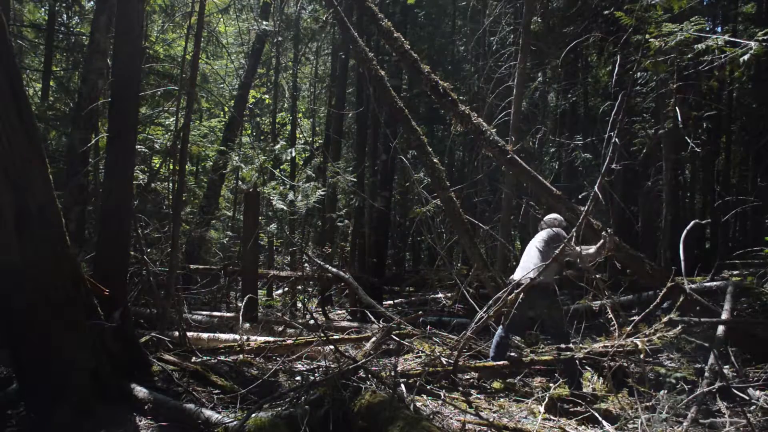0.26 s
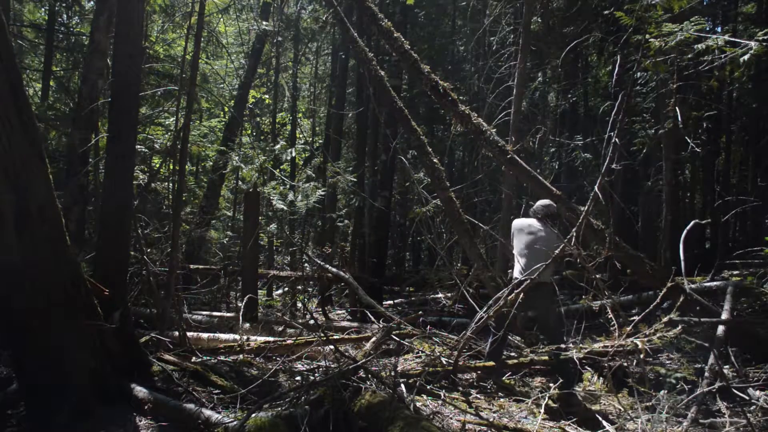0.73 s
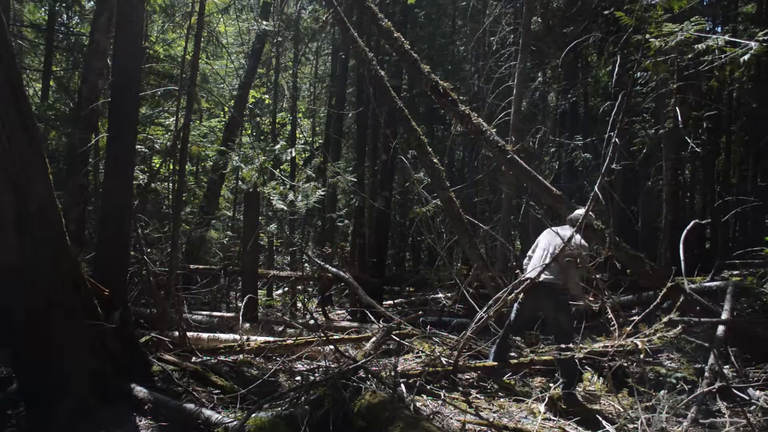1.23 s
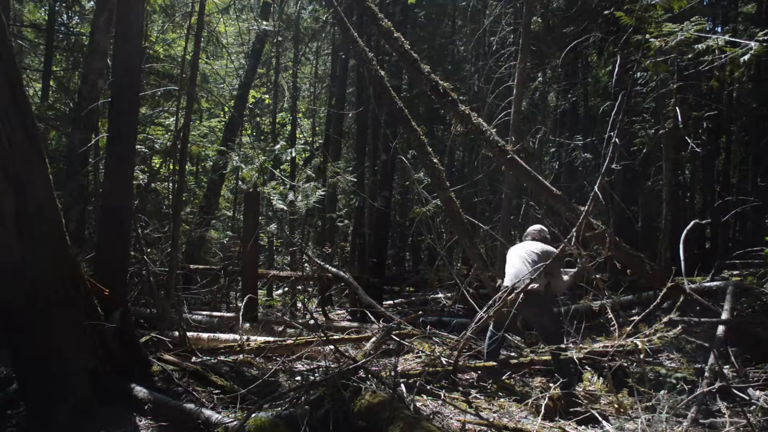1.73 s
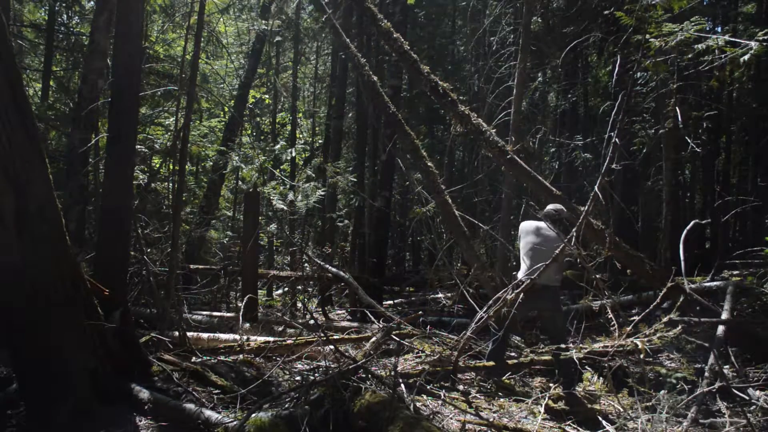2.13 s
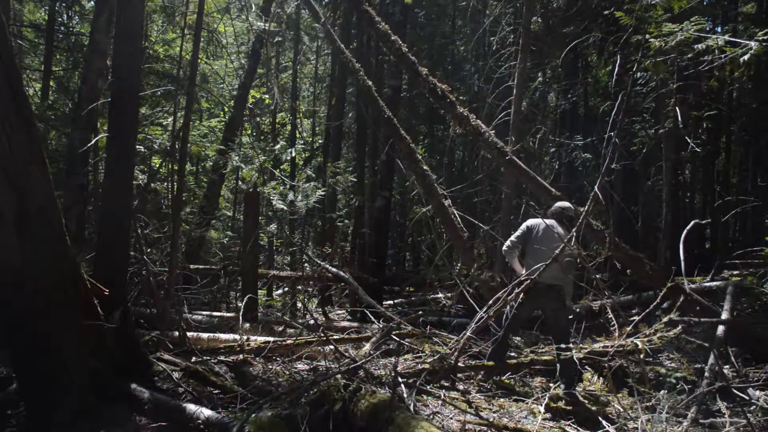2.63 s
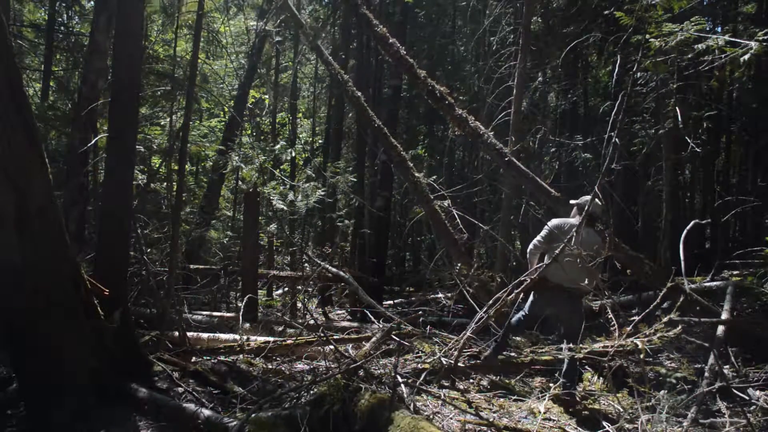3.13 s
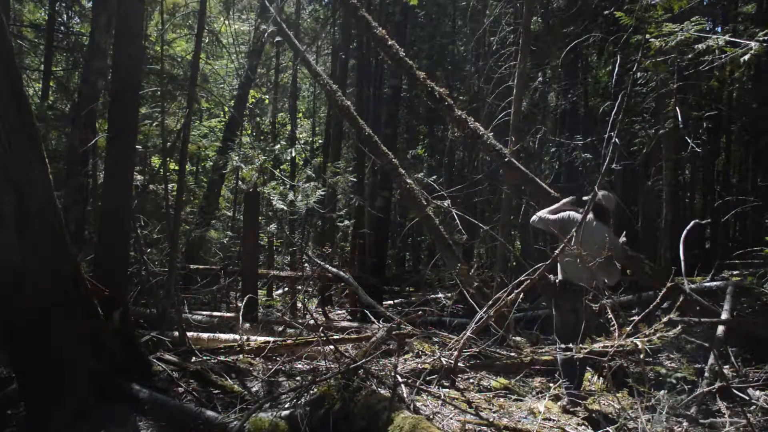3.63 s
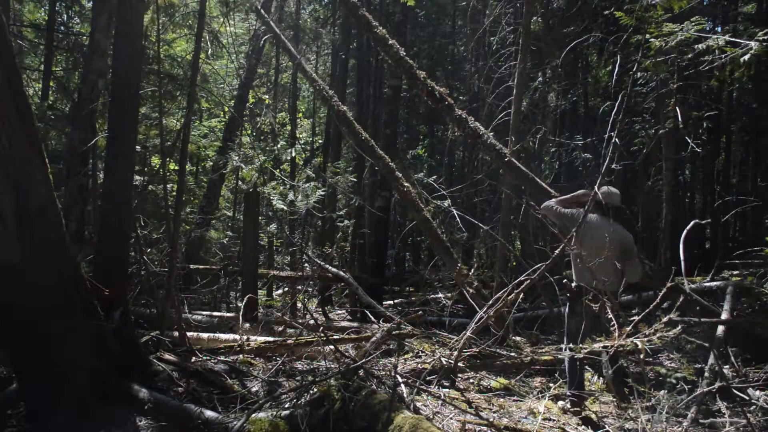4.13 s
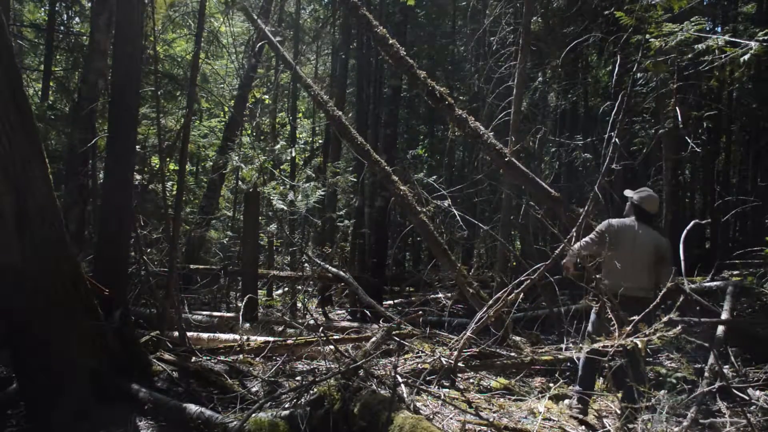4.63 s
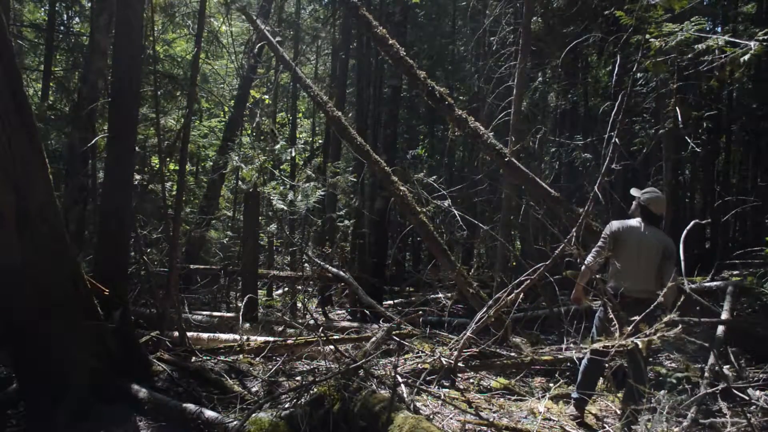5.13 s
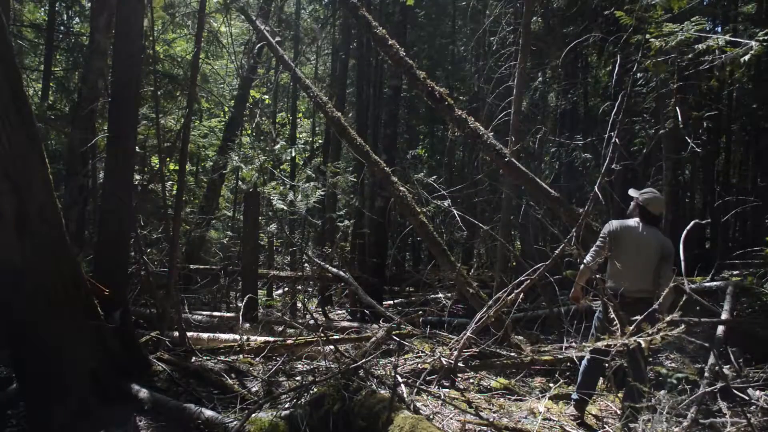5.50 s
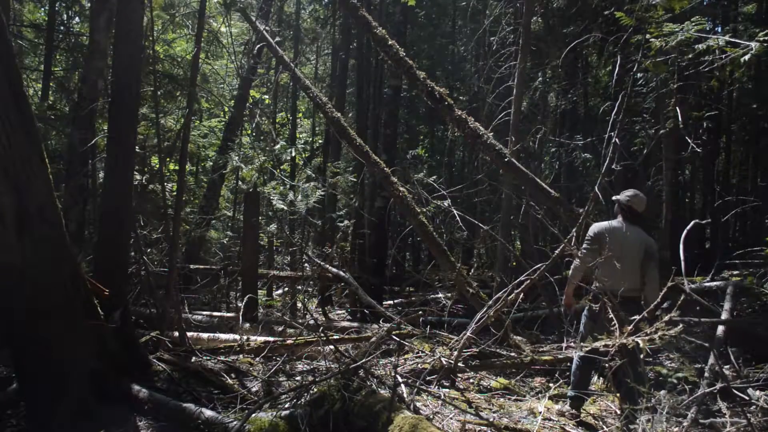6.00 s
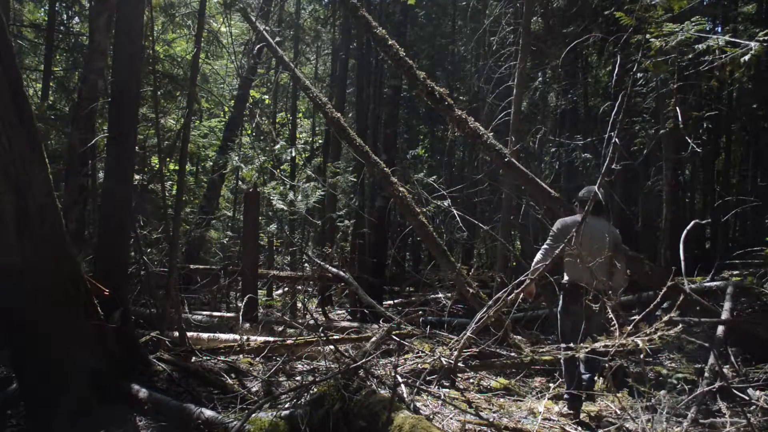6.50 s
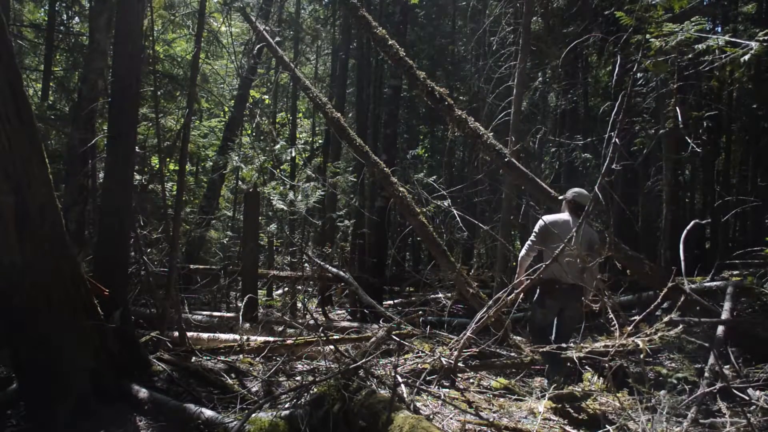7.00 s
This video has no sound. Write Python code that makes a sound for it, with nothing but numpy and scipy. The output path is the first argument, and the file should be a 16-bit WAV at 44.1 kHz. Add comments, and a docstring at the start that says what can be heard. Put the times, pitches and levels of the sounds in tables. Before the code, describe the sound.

Sharp wood breaks ring off surrounding tree trunks, followed by a busy push through brittle brush, small snaps, dull steps and quiet air.

```python
"""In a conifer forest, a man breaks two dead limbs off a leaning tree, pushes through dry twigs and steps away.
Each limb gives a warning tick, then a crack of tearing fibres and ringing wood; both are clipped at full scale.
Twigs are short jerky noise bursts with resonances, the brush is a rain of ringing clicks,
rubbing sticks are noise-driven modes, and footfalls are low bursts.
The trunks scatter all the wood sounds into a long tail of decaying noise bands, over still, coloured air."""
import sys
import numpy as np
from scipy import signal
from scipy.fft import rfft, irfft
from scipy.io import wavfile
from scipy.ndimage import uniform_filter1d

SR = 44100
rng = np.random.default_rng(int(sys.argv[2]) if len(sys.argv) > 2 else 0)


def digitize_waveform(pressure):
    """Quantize a signal to 16-bit integers and store it at the path in sys.argv[1].

    Rows of a 2-D input are taken as channels; values are limited to [-1, 1].
    """
    field = np.atleast_2d(pressure).T
    bounded = np.clip(field, -1, 1)
    quanta = np.round(bounded * 32767).astype(np.int16)
    wavfile.write(sys.argv[1], SR, quanta)


N = 320063

# colour of the still forest air: (frequency [Hz], relative level per Hz [dB])
AIR_COLOUR = [(15, -10), (25, -10.5), (114, 7.5), (640, -5), (773, -7.5), (959, -7), (1100, -6), (1220, -9),
              (1520, -9.5), (2750, -13), (3320, -13), (4360, -12.5), (8110, -26.5), (9530, -15),
              (15900, -26)]
# colours of fine twigs and of thicker sticks: (frequency [Hz], relative level per Hz [dB])
CRACKLE_COLOUR = [(1500, -12.5), (3000, -5), (5000, -3.5), (8000, 0), (10800, 0), (12500, -9.5),
                  (16000, -20.5)]
CLATTER_COLOUR = [(120, -5), (300, 8.5), (600, -6.5), (1150, 0.5), (2000, -4.5), (3200, -10.5),
                  (5500, -28.5)]
# effort of pushing through the thicket, as the level of its crackle: (time [s], level [dB])
PUSH_EFFORT = [(2.3, -56), (2.5, -42.5), (2.66, -36.5), (2.92, -43), (3.05, -36), (3.15, -39),
               (3.33, -33.5), (3.62, -40.5), (3.8, -33), (3.96, -44), (4.22, -38.5), (4.42, -41),
               (4.56, -47), (4.68, -42.5), (4.9, -65.5)]
# single rustles as he shifts his grip or takes a step: (time of the peak [s], level [dB], length [s])
RUSTLES = [(0.113, -52, 0.15), (0.445, -37.5, 0.037), (1.584, -53, .03), (1.73, -53, 0.027),
           (2.643, -33.5, 0.031), (4.652, -44, 0.031), (5.107, -52, 0.12), (5.43, -47.5, 0.019),
           (5.86, -51.5, .08), (6.239, -44, 0.025), (6.527, -54, 0.021), (6.82, -53, 0.075),
           (6.975, -54, 0.047)]
# scatter from the trunks against the direct sound: (frequency [Hz], level [dB])
FOREST_LEVELS = [(60, -6), (280, -4.5), (500, -3), (950, 3.5), (1500, -2.5), (2500, -6), (4000, -5.5),
                 (10000, -10), (12500, -5.5), (16000, -9)]
# how long the trunks keep scattering: (frequency [Hz], 60 dB decay time [s])
FOREST_DECAYS = [(60, 0.76), (250, 0.86), (900, 1.35), (2000, 0.89), (5000, 1.08), (10000, 0.98),
                 (16000, 0.75)]
# sticks rubbing on each other: (time [s], level [dB], pitch [Hz], length [s])
RUBS = [(0.299, -48.5, 2550, 0.016), (1.601, -41.5, 2460, 0.014), (3.011, -29, 1460, 0.016),
        (3.217, -34.5, 1230, 0.027), (3.728, -29, 1360, 0.016), (4.137, -33, 1210, 0.015),
        (4.382, -37, 1200, .02), (4.833, -40.5, 2600, 0.012), (4.863, -43, 1430, 0.011),
        (5.104, -43.5, 1420, 0.028), (5.22, -39.5, 1414, 0.018), (5.262, -57, 1480, 0.014),
        (5.316, -52, 1400, 0.009), (5.619, -55, 1080, .014), (5.671, -53.5, 1154, 0.017),
        (6.135, -54, 1100, .015), (7.061, -54.5, 1500, 0.013)]
# modes of a rubbed stick: (multiple of the pitch [ratio], relative level [dB], 60 dB decay time [s])
STICK_MODES = [(.68, -17, .01), (0.801, 0, 0.022), (1, 6.5, 0.017), (1.35, -12, 0.01)]
# twigs snapping: (time [s], level [dB], brightness [dB per octave], main ring [Hz], tearing time [s])
SNAPS = [(0.4402, -44.5, 7.5, 8800, .004), (0.5441, -31, 3, 8800, 0.019),
         (1.1514, -45.5, -2.5, 1320, 0.0039), (1.2683, -52, 4, 8900, 0.00083),
         (1.465, -49, 0.5, 9360, .0013), (1.9081, -30.5, 3.5, 8700, 0.0016),
         (2.0996, -33.5, 7.5, 8400, 0.024), (2.2522, -36, 4.5, 4170, 0.0022),
         (2.4738, -37.5, -1.5, 3900, 0.0011), (2.6084, -35, 3, 4070, .0015), (2.6201, -30, 0, 8900, 0.0018),
         (2.6405, -30, -1, 6000, 0.0032), (2.6994, -34.5, -3, 2540, 0.0017),
         (2.8175, -28, -2, 1380, 0.0045), (2.823, -22.5, 3, 4100, 0.0011),
         (2.8945, -28.5, 2, 10000, 0.00064), (3.0172, -28.5, 0, 1500, 0.0058),
         (3.0626, -28.5, 0, 10200, 0.0087), (3.181, -26.5, 0.5, 1980, .0034),
         (3.2133, -30.5, -.5, 2010, 0.004), (3.23, -31, 0, 1580, 0.0034), (3.3396, -39, 10, 8400, 0.0023),
         (3.372, -28.5, 2.5, 9400, 0.00041), (3.4307, -18, 3, 9000, 0.0013),
         (3.5334, -24.5, 2, 6450, 0.0016), (3.5494, -34, -2.5, 1590, 0.003),
         (3.6782, -32.5, 1, 9600, 0.0091), (3.7056, -32, 2.5, 4540, .001),
         (3.7412, -28, 3.5, 10000, 0.00088), (3.7722, -21, 6.5, 10850, 0.0033),
         (3.7754, -17.5, 0.5, 4800, 0.00058), (3.841, -32, 2, 8000, 0.0022),
         (3.872, -38.5, 8, 10300, .0007), (3.9211, -24, 4.5, 9600, 0.0006),
         (3.9348, -30.5, 6, 5160, 0.00027), (3.9773, -27.5, 1, 7300, 0.00053),
         (4.1399, -30, -0.5, 5100, 0.0058), (4.208, -36, 3, 8100, .005), (4.2462, -36.5, -2, 8900, 0.0035),
         (4.3169, -33, 2, 10300, 0.00063), (4.357, -40, 5, 11800, 0.00075), (4.4001, -39, 0, 8940, 0.0015),
         (4.4542, -22, 2.5, 4820, 0.00045), (4.625, -32.5, 8.5, 9100, 0.0024),
         (4.6936, -37.5, 1.5, 8500, .002), (4.7248, -22, 3, 7330, .001), (4.9833, -51.5, 9, 8950, 0.005),
         (5.1528, -46, 2.5, 3450, .004), (5.3075, -43.5, 11, 9840, 0.0033),
         (5.399, -53, 14.5, 10100, 0.0017), (5.8405, -48.5, 5.5, 6040, .005), (5.9347, -47, 5, 9700, .007),
         (6.222, -47, 4.5, 11000, .0004), (6.3154, -42, 5.5, 9100, 0.0013), (6.538, -48.5, 7, 9200, .004),
         (6.9704, -43, 2.5, 10200, .001)]
# borders of a snap's thud, wood, crack and splinter bands: (frequency [Hz])
SNAP_EDGES_HZ = [150, 700, 2500, 7000, 12000]
# balance of those four bands before the brightness tilts them: (level [dB])
SNAP_BANDS_DB = [-18, 0, -0.5, 1]
# dull thuds of feet and sticks on the ground: (time [s], level [dB])
THUDS = [(0.441, -40.5), (2.252, -34), (2.641, -32.5), (3.678, -36.5), (3.775, -31), (4.246, -37),
         (4.694, -39), (6.222, -46), (6.971, -38.5)]
# first fibres giving way in a strained limb: (time [s], level [dB], ring [Hz], 60 dB decay time [s])
FIBRES = [(0.5453, -31, 3520, 0.32), (0.5453, -26.5, 1640, 0.044), (1.9088, -34, 3610, 0.43)]
# limbs breaking: (time [s], direct tear level [dB], tearing time [s], decay after it [s],
# ring level [dB], tear level sent out to the trees [dB])
BREAKS = [(0.5742, -0.5, 0.0056, 0.0012, -10.5, -2.5), (1.938, 1.5, 0.00353, 0.0005, -3.5, 3)]
# colour of each limb's tear, and of a tear averaged over all directions:
# (frequency [Hz], relative level per Hz [dB])
THIN_TEAR = [(60, -11.5), (240, -17.5), (600, -14.5), (1100, -19), (1550, 7), (2600, -1.5), (3200, -10.5),
             (3850, 6), (5200, -14), (10000, -9), (13000, -18), (16000, -34.5)]
THICK_TEAR = [(60, -6), (150, -8.5), (350, 0.5), (600, -5), (1200, -16), (2050, -1.5), (3000, -8.5),
              (5000, -9), (10000, -15), (13000, -24), (16000, -22.5)]
TEAR_AROUND = [(400, -1.5), (1600, 0), (4000, -2.5), (5500, -7), (10000, -4.5), (13000, -21), (16000, -28)]
# what the two limbs ring with: (frequency [Hz], level against the ring level [dB], 60 dB decay time [s])
THIN_MODES = [(233.4, -8.5, .06), (426, -21, .03), (550, -17, 0.024), (920, -18, .02), (1280, -9.5, .015),
              (1640, 0, 0.016)]
THICK_MODES = [(128.2, -12, 0.074), (274, -6.5, 0.11), (403, -9, 0.036), (667.6, -5, 0.052),
               (790, -1, 0.023), (944, -2.5, 0.034), (1073, -3, 0.048)]

AIR_DB = -52.5
CLATTER_DB = -8.5  # thick sticks, on top of how strongly they are stirred
PUSH_CLATTER_DB, RUSTLE_CLATTER_DB = 3, -4  # stirring of thick sticks against that of fine twigs
RUSTLE_RISE, RUSTLE_FALL = 1, 1.5  # as shares of the rustle's length
SETTLING_DB = -59  # stirring of the litter, which never lies quite still
DEBRIS_DB, DEBRIS_FADE_DB_PER_S = -27.5, 25  # stirring by debris, against the level of the break
SNAP_PIVOT_HZ = 4230  # brightness tilts the bands about this frequency
# lesser twigs: level against the push and its spread either way, limit of the random brightness, tearing time
SMALL_SNAP_DB, SMALL_SNAP_SPREAD_DB = -6, 10.5
SMALL_SNAP_DB_PER_OCTAVE, SMALL_SNAP_TEAR_S = -0.5, 0.0009
THUD_S, THUD_LOW_HZ, THUD_HIGH_HZ = 0.0058, 151, 700
CUTOFF_HZ = 16000


def from_db(db):
    """Decibels to gain."""
    return 10 ** (np.asarray(db) / 20)


def rms_one(x):
    """Scale to an rms of 1."""
    return x / np.sqrt(np.mean(x ** 2) + 1e-20)


def at_hz(points, hz):
    """Read a table on a log-frequency axis."""
    f, value = np.transpose(points)
    return np.interp(np.log(np.maximum(hz, 1)), np.log(f), value)


def add(out, s, sound):
    """Mix a sound in at time s."""
    i = max(round(s * SR), 0)
    out[i:i + len(sound)] += sound[:len(out) - i]


def band_pass(low, high):
    """Butterworth band-pass sections."""
    return signal.butter(2, [low, high], "band", fs=SR, output="sos")


def ring(x, hz, t60):
    """A two-pole resonator: a unit click sets a sine of height 1 ringing, down 60 dB after t60 seconds."""
    radius = 1000 ** (-1 / (t60 * SR))
    w = 2 * np.pi * hz / SR
    return signal.lfilter([0, np.sin(w)], [1, -2 * radius * np.cos(w), radius ** 2], x + 1e-18)


def colour(x, spectrum, size=4096):
    """Causal (minimum-phase) filter of unit power with the given spectrum."""
    gains = from_db(at_hz(spectrum, np.fft.rfftfreq(size, 1 / SR)))
    cepstrum = irfft(np.log(gains))
    # folding the cepstrum forward in time makes the phase minimal
    cepstrum[1:size // 2] *= 2
    cepstrum[size // 2 + 1:] = 0
    response = irfft(np.exp(rfft(cepstrum)))
    return signal.fftconvolve(x, response / np.linalg.norm(response))[:len(x)]


def fracture(envelope, count=5, size=24):
    """A volley of fibre failures that follows an envelope, spread evenly over all frequencies; energy 1."""
    x = rng.standard_normal(len(envelope)) * envelope
    for _ in range(count):
        # flatten the spectrum, then restore the envelope
        x = irfft(np.exp(1j * np.angle(rfft(x))), len(x))
        local_power = np.abs(uniform_filter1d(x * x, size))
        x = x * envelope / np.sqrt(local_power + 1e-12)
    return x / np.linalg.norm(x)


def still_air():
    """Steady noise in the colour of quiet forest air."""
    return from_db(AIR_DB) * colour(rng.standard_normal(N), AIR_COLOUR)


def stirring():
    """How strongly push, rustles, falling debris and settling stir fine twigs and thick sticks; two gains."""
    t = np.arange(N) / SR
    push = from_db(np.interp(t, *np.transpose(PUSH_EFFORT), left=-np.inf, right=-np.inf))
    rustle, debris = np.zeros(N), np.zeros(N)
    for s, db, length_s in RUSTLES:
        width_s = length_s * np.where(t < s, RUSTLE_RISE, RUSTLE_FALL)
        rustle += from_db(db) * np.exp(-((t - s) / width_s) ** 2)
    for s, db, *_ in BREAKS:
        debris += (t > s) * from_db(DEBRIS_DB + db - DEBRIS_FADE_DB_PER_S * np.abs(t - s))
    settling = from_db(SETTLING_DB)
    fine = np.sqrt(push ** 2 + rustle ** 2 + settling ** 2)
    thick_push = from_db(PUSH_CLATTER_DB) * push
    thick_rustle = from_db(RUSTLE_CLATTER_DB) * rustle
    thick = np.sqrt(thick_push ** 2 + thick_rustle ** 2 + debris ** 2 + settling ** 2)
    return fine, thick


def grains(per_s, spread_db, cycles, count=14):
    """Clumps of clicks, each ringing for a few cycles in a twig of its own size; rms 1."""
    knots = np.arange(0, N, SR // 60)  # the density wanders 60 times a second
    clumps = from_db(5.6 * np.interp(np.arange(N), knots, rng.standard_normal(len(knots))))
    sizes = from_db(spread_db * np.minimum(rng.exponential(1, N), 4)) * rng.choice([-1, 1], N)
    clicks = sizes * (rng.random(N) < per_s * clumps / SR)
    pitches = np.geomspace(700, 14000, count)
    dealt = rng.integers(0, count, N)  # which twig each click falls on
    out = np.zeros(N)
    for k, hz in enumerate(pitches):
        kicks = np.diff(clicks * (dealt == k), prepend=0)
        # balance the loss of low pitches in the differenced clicks
        out += ring(kicks, hz, cycles / hz) / np.sin(np.pi * hz / SR) * hz
    return rms_one(out)


def brush():
    """Fine twigs and needles crackle; thicker sticks clatter lower and less often."""
    fine_gain, stick_gain = stirring()
    fine = colour(grains(per_s=3600, spread_db=2.5, cycles=5.2), CRACKLE_COLOUR) * fine_gain
    sticks = colour(grains(per_s=810, spread_db=0.0, cycles=9.0), CLATTER_COLOUR) * stick_gain
    return fine + from_db(CLATTER_DB) * sticks


def forest(x, onset_s=0.0019, near_share=0.7, near_s=0.023, grain_db=5.0, count=17):
    """Countless echoes off trunks: uneven and strong at first, then a smooth tail, longest in the middle range."""
    t = np.arange(2 * SR) / SR
    unevenness = from_db(grain_db * rng.standard_normal(len(t)) * np.exp(-t / 0.071))
    echoes = rng.standard_normal((2, len(t))) * unevenness
    shape = (1 - np.exp(-(t / onset_s) ** 2)) * (1 + near_share * np.exp(-t / near_s))
    edges = np.geomspace(45, 17000, count + 1)
    response = np.zeros(len(t))
    for k, (low, high) in enumerate(zip(edges, edges[1:])):
        hz = np.sqrt(low * high)
        decay = 1000 ** (-t / at_hz(FOREST_DECAYS, hz))
        # neighbouring bands take different noise
        band = signal.sosfilt(band_pass(low, high), echoes[k % 2] * shape * decay)
        level = np.sqrt(2 * (high - low) / SR) * from_db(at_hz(FOREST_LEVELS, hz))
        response += band / np.linalg.norm(band) * level
    return signal.fftconvolve(x, response)[:N]


def rubs(size=4096):
    """A short run of slips drives the modes of a stick."""
    out, t = np.zeros(N), np.arange(size) / SR
    for s, db, pitch_hz, length_s in RUBS:
        slips = fracture(t / length_s * np.exp(-3 * t / length_s))
        sound = sum(from_db(level) * ring(slips, pitch_hz * ratio, t60) for ratio, level, t60 in STICK_MODES)
        # the level is the rms over the rub's length
        add(out, s, from_db(db) * np.sqrt(length_s * SR) * sound / np.linalg.norm(sound))
    return out


def small_snaps(count=36):
    """Rows like those of SNAPS for lesser twigs: the harder the push, the more often and the louder they break."""
    s, push_db = np.transpose(PUSH_EFFORT)
    t = np.arange(N) / SR
    work = np.cumsum(from_db(np.interp(t, s, push_db)) * (t > s[0]) * (t < s[-1]))
    when, size, tilt, pitch = rng.random((count, 4)).T
    # one break at random within each equal share of the work
    times = np.interp((np.arange(count) + when) / count, work / work[-1], t)
    levels = np.interp(times, s, push_db) + SMALL_SNAP_DB + SMALL_SNAP_SPREAD_DB * (2 * size - 1)
    ring_hz = 1500 * 7 ** pitch
    tear_s = np.full(count, SMALL_SNAP_TEAR_S)
    return np.column_stack([times, levels, tilt * SMALL_SNAP_DB_PER_OCTAVE, ring_hz, tear_s])


def twigs(rise_s=0.00046, after_s=0.013, after_share=0.1, uneven_db=4.0, ring_width_hz=330,
          ring_gain=3.5, other_gain=2.45, top_hz=11800, size=2048):
    """Twigs tear in uneven jerks and ring briefly; returns the direct sound and the ringless one sent around."""
    (direct, around), t = np.zeros((2, N)), np.arange(size) / SR
    bands = [band_pass(*edges) for edges in zip(SNAP_EDGES_HZ, SNAP_EDGES_HZ[1:])]
    centres_hz = np.sqrt(np.multiply(SNAP_EDGES_HZ[:-1], SNAP_EDGES_HZ[1:]))
    octaves = np.log2(centres_hz / SNAP_PIVOT_HZ)
    dull = signal.butter(2, top_hz, fs=SR, output="sos")
    span = 0.006 * SR  # band levels are rms over 6 ms
    for s, level_db, brightness, hz, tear_s in [*SNAPS, *small_snaps()]:
        levels = level_db + np.array(SNAP_BANDS_DB) + brightness * octaves
        jerks = from_db(uneven_db * np.repeat(rng.standard_normal(size // 32), 32))
        decay = np.exp(-t / tear_s) + after_share * np.exp(-t / after_s)
        plain = signal.sosfilt(dull, fracture(jerks * np.minimum(t / rise_s, 1) * decay))
        # the main ring, and three more bending modes that differ from twig to twig
        modes_hz = [hz, *np.exp(rng.uniform(np.log(900), np.log(7000), size=3))]
        rings = []
        for f in modes_hz:
            sharpness = np.sqrt(f * SNAP_PIVOT_HZ) / ring_width_hz  # low modes ring longer than high ones
            rings.append(signal.lfilter(*signal.iirpeak(f, sharpness, fs=SR), plain))
        rung = plain + ring_gain * rings[0] + other_gain * sum(rings[1:])
        for out, burst in ((direct, rung), (around, plain)):
            for k, (sos, db) in enumerate(zip(bands, levels)):
                # alternate signs so that neighbouring bands join smoothly
                part = (-1) ** k * signal.sosfilt(sos, burst)
                add(out, s, from_db(db) * np.sqrt(span) * part / np.linalg.norm(part))
    return direct, around


def thuds(size=2048):
    """Weight lands on the ground in a short, dull burst."""
    out, t = np.zeros(N), np.arange(size) / SR
    for s, db in THUDS:
        burst = signal.sosfilt(band_pass(THUD_LOW_HZ, THUD_HIGH_HZ), fracture(np.exp(-t / THUD_S)))
        add(out, s, from_db(db) * np.sqrt(THUD_S * SR) * burst / np.linalg.norm(burst))
    return out


def limbs(body_above_hz=140, size=8192):
    """Fibres tear for milliseconds, then freed wood rings; returns the direct sound and what goes to the trees."""
    (direct, around), t = np.zeros((2, N)), np.arange(size) / SR
    kick = signal.unit_impulse(size)
    # the ringing of both limbs is cut below a low edge, so no deep rumble lies under it
    bass_cut = signal.butter(2, body_above_hz, "high", fs=SR, output="sos")
    for s, db, hz, t60 in FIBRES:
        add(direct, s, from_db(db) * ring(kick, hz, t60))
    for row, tear, modes in zip(BREAKS, (THIN_TEAR, THICK_TEAR), (THIN_MODES, THICK_MODES)):
        s, db, tear_s, decay_s, ring_db, around_db = row
        envelope = np.minimum(t / (0.49 * tear_s), 1) * np.exp(-np.maximum(t - tear_s, 0) / decay_s)
        burst = np.sqrt(tear_s * SR) * fracture(envelope)
        body = np.zeros(size)
        for k, (hz, level, t60) in enumerate(modes):
            body += (-1) ** k * from_db(ring_db + level) * ring(kick, hz, t60)
        body = signal.sosfilt(bass_cut, body)
        add(direct, s, from_db(db) * colour(burst, tear))
        add(around, s, from_db(around_db) * colour(burst, TEAR_AROUND))
        add(direct, s + tear_s, body)
        add(around, s + tear_s, body)
    return direct, around


def scene():
    """All the wood sounds, their scatter among the trees, and the still forest air."""
    limb, limb_around = limbs()
    twig, twig_around = twigs()
    sticks = rubs()
    litter = brush() + thuds()
    tail = forest(limb_around + twig_around + litter + sticks)
    return (limb + twig + sticks + litter + tail + still_air())[None]


def record(dry):
    """Peaks beyond full scale are clipped flat, as in an overloaded microphone; then a steep low-pass cuts the top."""
    clipped = np.clip(dry, -1, 1)
    low_pass = signal.ellip(10, 0.1, 70, CUTOFF_HZ, fs=SR, output="sos")
    return signal.sosfilt(low_pass, clipped)


dry = scene()
out = record(dry)
digitize_waveform(out)
```